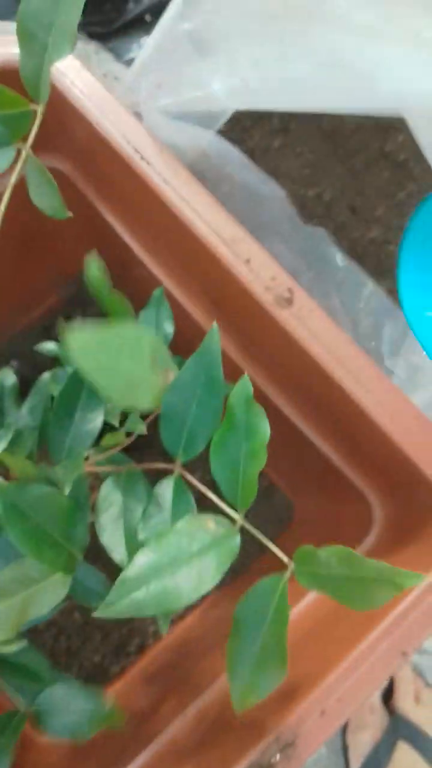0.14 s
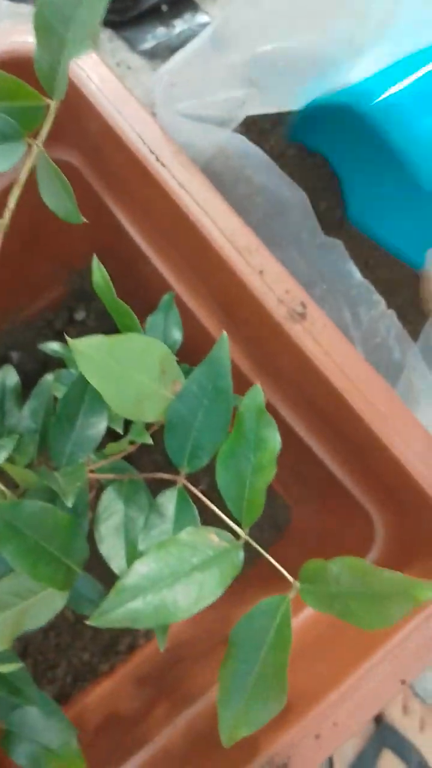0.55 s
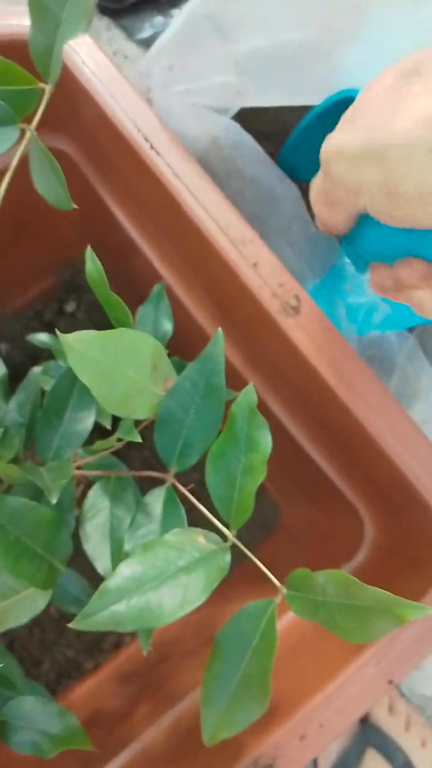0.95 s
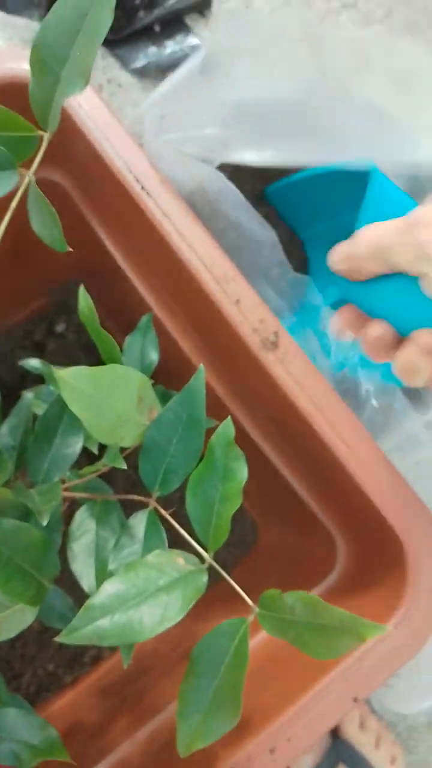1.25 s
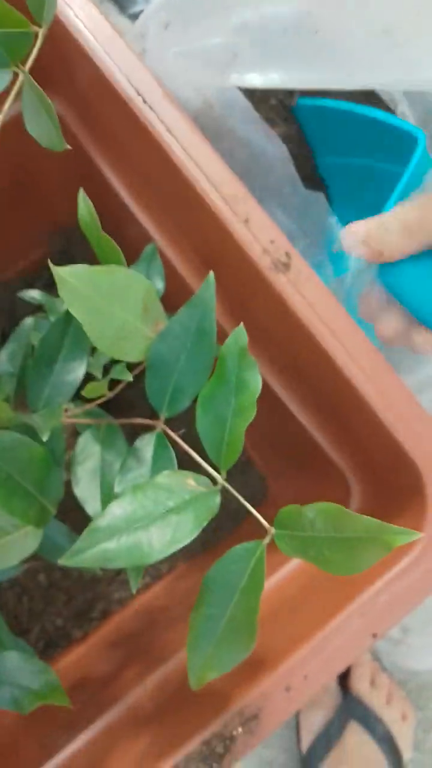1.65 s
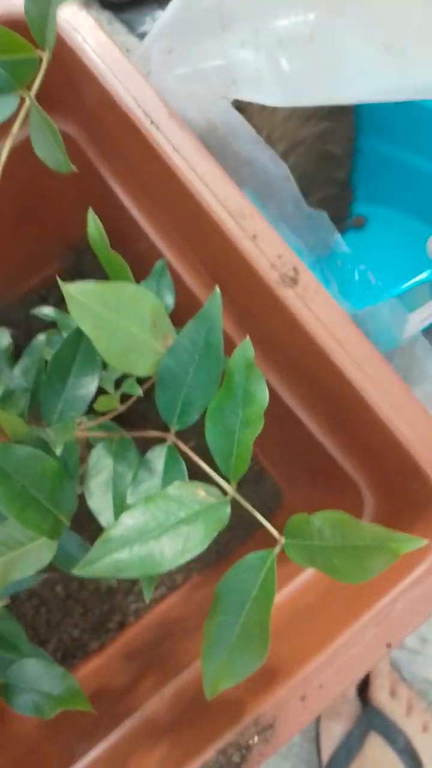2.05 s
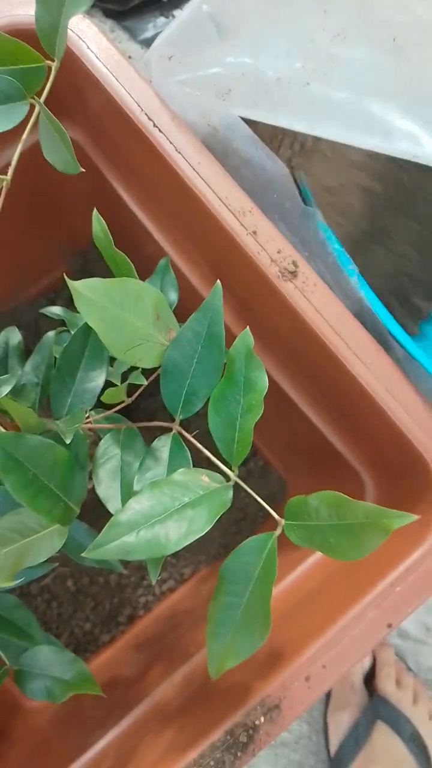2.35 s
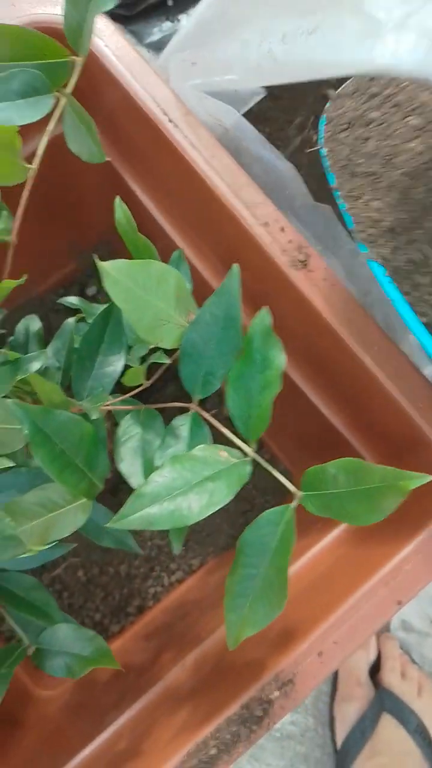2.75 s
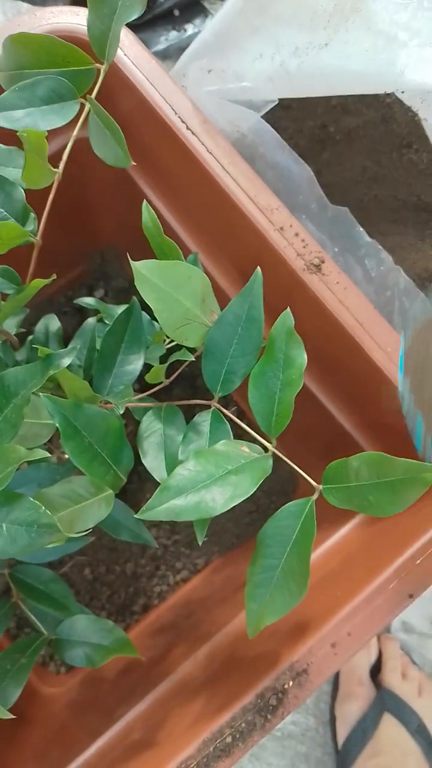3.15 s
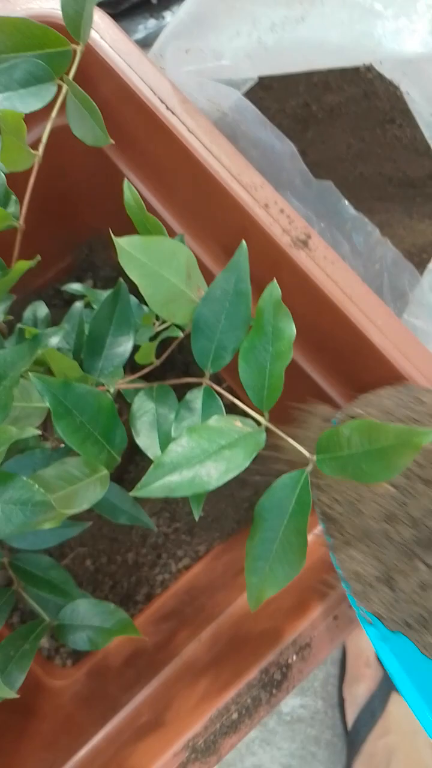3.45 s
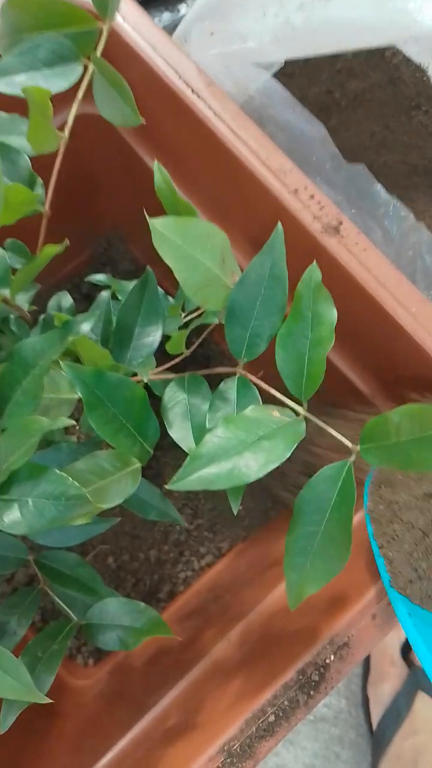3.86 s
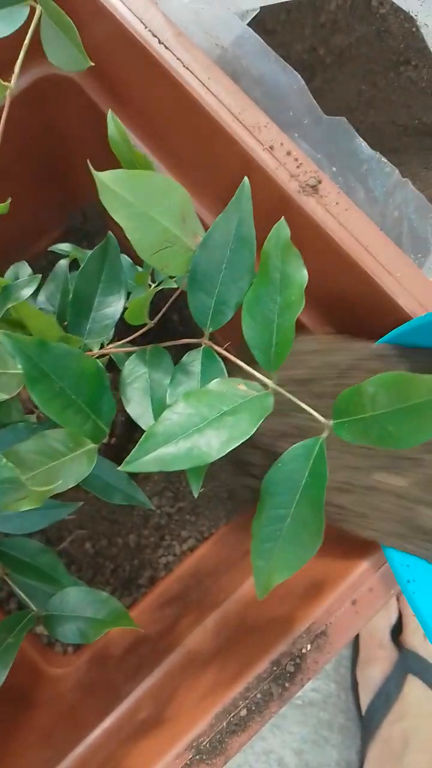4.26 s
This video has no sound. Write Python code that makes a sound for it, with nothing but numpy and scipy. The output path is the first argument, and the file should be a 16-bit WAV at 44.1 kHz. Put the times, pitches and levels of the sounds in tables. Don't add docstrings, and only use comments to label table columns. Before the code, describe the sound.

Close to a phone microphone, a plastic scoop is pushed into dry potting soil with harsh gritty surges and sharp bag-film snaps. It turns dull and quieter as it twists deep, then rasps out full with more crackles. After a brief very quiet gap, pebbles, grains and clods patter into a plastic planter. Dry, with hardly any background.

```python
import sys
import numpy as np
from scipy import signal
from scipy.fft import rfft, irfft, next_fast_len
from scipy.io import wavfile
from scipy.ndimage import uniform_filter1d, map_coordinates

SR = 44100
rng = np.random.default_rng(int(sys.argv[2]) if len(sys.argv) > 2 else 0)


def transcribe(u):
    v = np.clip(np.atleast_2d(u).T, -1, 1)
    q = np.round(v * 32767).astype(np.int16)
    wavfile.write(sys.argv[1], SR, q)


def nominal_scale(level):
    x = np.asarray(level, float) / 20
    return 10 ** x


N = 194436
EASY_DB = -50


def unit(x):
    return x / np.sqrt(np.mean(x ** 2) + 1e-20)


def curves(rows):
    s, *cols = np.transpose(rows)
    return [np.interp(np.arange(N) / SR, s, c) for c in cols]


def wobble(rate_hz):
    knots = rng.standard_normal(int(N * rate_hz / SR) + 4)
    return map_coordinates(knots, [np.arange(N) * rate_hz / SR])


def filtered(x, response):
    m = next_fast_len(N + SR // 2)
    return irfft(rfft(x, m) * response(np.fft.rfftfreq(m, 1 / SR)), m)[..., :N]


def colour(points):
    f, db = np.transpose(points)
    return lambda hz: nominal_scale(np.interp(np.log(hz + 1), np.log(f), db))


def modes(rows, lo_hz, hi_hz):
    def ring(f):
        return sum(nominal_scale(db / 2) * 1j * f * w / (c * c - f * f + 1j * f * w)
                   for c, w, db in rows if lo_hz < c < hi_hz)
    return lambda f: ring(f) ** 2 / (1 + (f / hi_hz) ** 8)


def grains(per_s, spread_db, smooth):
    hit = rng.random(N) < per_s / SR
    size = nominal_scale(spread_db * np.minimum(rng.exponential(size=N), 3))
    contacts = hit * size * rng.standard_normal(N)
    return np.sqrt(1 - smooth) * unit(contacts) + np.sqrt(smooth) * rng.standard_normal(N)


def patchy(x, depth_db):
    _, s, z = signal.stft(x, SR, nperseg=256)

    def field(bins, frames):
        return unit(uniform_filter1d(uniform_filter1d(rng.standard_normal(z.shape), bins, 0), frames, 1))

    buried = (s > 1.04) & (s < 2.1)
    gain_db = depth_db * field(3, 24) + (-0.5 + 2.5 * buried) * field(5, 6)
    return unit(signal.istft(z * nominal_scale(gain_db), nperseg=256)[1][:N])


def dull(x, hidden=True):
    t = np.arange(N) / SR
    deep = hidden * np.clip(np.minimum(t - 1.06, 2.44 - t) / 0.05, 0, 1)

    def shade(top_hz):
        return filtered(x, lambda hz: 1 / (1 + (hz / top_hz) ** 30) ** 0.5)

    return (1 - deep) * shade(12300) + deep * shade(11400)


# f/Hz, density/dB
QUIET = [(18, -34.5), (30, -13), (58, -11), (230, -11.5), (1110, -10), (1570, -22.5), (3260, -22.5),
         (15700, -42.5)]


def floor():
    return nominal_scale(-76.5) * unit(filtered(rng.standard_normal(N), colour(QUIET)))


def mic_hiss():
    noise = filtered(rng.standard_normal(N), lambda hz: 1 / (1 + (11000 / (hz + 1)) ** 8))
    return nominal_scale(-88 + 1.53 * wobble(8.1)) * unit(noise)


def yard(x):
    t = np.arange(SR // 8) / SR
    tail = rng.standard_normal(len(t)) * nominal_scale(-60 * t / 0.08)
    return x + nominal_scale(-13) * signal.fftconvolve(x, tail / np.linalg.norm(tail))[:N]


def near_wall(x):
    def answer(f):
        delay = np.exp(-2j * np.pi * f * 0.00172)
        return -0.55 * delay / (1 + (f / 2500) ** 2) / (1 + (800 / (f + 1)) ** 4)
    digging = np.arange(N) / SR < 3.7
    return x + filtered(x, answer) * digging


WAITING = [245, 590, 585, 1260]
ENTERING = [1136, 1136, 1136, 3100, 4390, 6761]
DEEP = [1070, 1750, 2500, 2500, 5170, 5900, 5900, 7800]
RISING = [1070, 2480, 3300, 3450, 4020, 4450, 5130, 6380, 7220, 7700, 8260, 9100, 10000]
CLEAR = [1790, 2566, 2970, 3200, 3790, 4240, 4800, 5930, 7150]
TIPPED = [1040, 1040, 1836, 2450, 2300, 3090, 4220, 4220, 4220, 4960, 6180, 7000, 8450, 9040]
RESTING = [570, 573, 1180, 1205, 8100]
EMPTY = [430, 430, 1530, 3730, 9700]
# from t/s, dips f/Hz, width/Hz, depth/dB
SPOTS = [
    (0, WAITING, 160, -10),
    (0.26, WAITING[:1] * 2 + ENTERING, 250, -5),
    (0.46, ENTERING, 250, -5),
    (1.2, DEEP, 220, -10),
    (1.88, RESTING, 220, -10),
    (2.12, RISING, 230, -15),
    (2.6, CLEAR, 200, -11),
    (3.12, [600, 2100], 500, -5),
    (3.75, TIPPED, 280, -11),
    (4.09, EMPTY, 200, -8),
]


def paths(x):
    t, out = np.arange(N) / SR, 0
    for start, dips, w, db in SPOTS:
        def dip(f):
            return np.prod([1 - (1 - nominal_scale(db)) * 1j * f * w / (c * c - f * f + 1j * f * w) for c in dips], axis=0)
        fade = np.clip((t - start) / 0.13, 0, 1) if start else 1
        out = out * (1 - fade) + fade * filtered(x, dip)
    return out


def knocks(rows):
    out, t = np.zeros(N + SR), np.arange(SR // 8) / SR
    chance = rng.random((len(rows), 2))
    for (s, db, hz), (a, b) in zip(rows, chance):
        cycles = max(35 * (hz / 1000) ** 0.48, 4)
        partial = np.sin(2 * np.pi * (hz * (0.65 + 0.0684 * a) * t + b))
        ring = np.sin(2 * np.pi * hz * t) + 0.34 * partial
        ring = ring * nominal_scale(-60 * t * hz / cycles) * (1 - np.exp(-t * hz / 0.22))
        out[round(s * SR):][:len(t)] += nominal_scale(db) * ring / np.abs(ring).max()
    return out[:N]


# t/s, peak/dB, ring f/Hz
LANDINGS = [
    (3.751, -50.5, 2095),
    (3.755, -42.5, 258),
    (3.793, -49.5, 270),
    (3.826, -49.5, 1650),
    (3.843, -42.5, 1660),
    (3.927, -48, 1700),
    (3.896, -36, 2120),
    (4.008, -34.5, 556),
]


def clods_landing():
    return knocks(LANDINGS)


# t/s, peak/dB, ring f/Hz
CLODS = [(0.329, -47, 840), (0.477, -37.5, 903), (0.544, -34, 1790), (0.775, -32.5, 1630),
         (0.899, -32.5, 1433), (1.151, -40, 983), (1.213, -39.5, 1440), (1.272, -38, 878),
         (1.366, -39, 1260), (1.384, -35.5, 1380), (1.393, -34, 1344), (1.5335, -34.5, 1483),
         (1.56, -35.5, 1300), (1.573, -41, 1360), (1.616, -40, 1390), (1.893, -48, 990), (2.001, -52, 856),
         (2.134, -41, 900), (2.164, -40, 910), (2.195, -41, 873), (2.24, -35, 1380), (2.288, -34.5, 900),
         (2.448, -34, 795), (2.601, -34.5, 245), (2.973, -40, 292), (3.01, -44, 1480), (3.132, -52, 1060)]


def clods_on_scoop():
    return knocks(CLODS)


def snaps(rows, t60_s, tick_share):
    out, t = np.zeros(N + SR), np.arange(SR // 30) / SR
    f = np.fft.rfftfreq(len(t), 1 / SR)
    noise = rng.standard_normal((len(rows), len(t)))
    hold_s = 0.0012
    crackle = nominal_scale(-60 * np.maximum(t - hold_s, 0) / t60_s) + 0.047 * nominal_scale(-60 * t / 0.071)
    envelope = (1 - np.exp(-t / 0.0004)) * crackle
    click = tick_share * 5 * np.exp(-((t - 0.0006) / 0.00003) ** 2)
    low = 0.23 * (1j * f / (1500 + 1j * f)) ** 2 / (1 + 1j * f / 5000) ** 2
    for (s, db, hz, top_db), n in zip(rows, noise):
        top = nominal_scale(top_db + 11.5) * (1j * f / (6000 + 1j * f)) ** 2 / (1 + 1j * f / 8500) ** 3
        peak = 1j * f * 0.33 * hz / (hz * hz - f * f + 1j * f * 0.24 * hz)
        snap = irfft(rfft(n * envelope + click) * (top + low + peak), len(t))
        out[round(s * SR):][:len(t)] += nominal_scale(db - 2.5) * snap / np.abs(snap).max()
    return out[:N]


# t/s, peak/dB, colour f/Hz, brightness/dB
PEBBLES = [(3.2854, -56, 2570, -2.5), (3.3993, -59.5, 2730, -21), (3.608, -60.5, 3300, -25.5),
           (3.725, -58, 8150, -8), (3.753, -53, 2750, -30.5), (3.7754, -43, 4770, -23),
           (3.8257, -53, 7300, -9), (3.8432, -32.5, 5570, 9), (3.8657, -34, 5340, 13),
           (3.89, -29, 10400, -6), (3.9274, -27.5, 4850, -12), (3.9305, -25.5, 8900, -14),
           (3.9375, -27, 4930, -25), (3.9838, -21, 10300, 19), (4.0064, -28.5, 4900, -14),
           (4.0258, -30, 5200, -8), (4.0533, -34, 5300, -20), (4.0694, -30, 7000, 16)]
# t/s, peak/dB, colour f/Hz, brightness/dB
SCATTER = [(3.731, -55, 3360, -20.5), (3.811, -54, 3360, -18), (3.8562, -43, 11070, -20),
           (3.9, -49, 2180, -13), (3.9044, -37, 10380, -20), (3.9601, -43, 11110, -20),
           (3.995, -32, 7190, -19), (4.0146, -27, 4780, -18), (4.0355, -33, 6550, -20),
           (4.0565, -36, 5740, -18.5), (4.0831, -45, 10900, -20), (4.1056, -50, 10160, -20),
           (4.1431, -51, 10420, -22), (4.1649, -55, 4780, -20)]


def pebbles():
    return snaps(PEBBLES, t60_s=0.01, tick_share=0.45) + nominal_scale(-2.5) * snaps(SCATTER, t60_s=0.013, tick_share=0.15)


# t/s, peak/dB, colour f/Hz, brightness/dB
FILM = [(0.478, -19.5, 5900, -49), (0.5097, -18.5, 2180, -10), (0.5215, -23, 2980, -26),
        (0.5452, -18, 9200, -4), (0.5537, -13.5, 3500, 4), (0.5648, -26, 7500, -6),
        (0.8759, -24, 6000, -22), (0.9007, -6.5, 6500, -13), (1.0786, -32.5, 6500, -18),
        (1.1513, -36, 5270, -18.5), (1.2141, -20.5, 6500, -16), (1.273, -33.5, 2860, -26),
        (1.5331, -29.5, 2750, -6), (1.5603, -41, 4400, -18), (1.6181, -29, 10000, -15),
        (1.7297, -27.5, 10300, -36), (1.89, -47, 2830, -8), (2.0053, -33.5, 6800, -23),
        (2.134, -50, 2760, -31), (2.165, -45, 2900, -27), (2.195, -39, 2390, -26),
        (2.2193, -17.5, 7440, -4), (2.243, -33, 5300, -19), (2.3364, -26.5, 2670, -32),
        (2.3575, -45, 2980, -25), (2.4498, -20.5, 2830, -23), (2.5637, -23, 2840, -29),
        (2.6018, -20, 2870, -11), (2.6699, -25, 2620, -35), (2.7714, -16.5, 3430, -14)]
# t/s, peak/dB, colour f/Hz, brightness/dB
CRACKLES = [(0.2939, -46, 6550, -20), (0.3126, -47, 3450, -20), (0.321, -49, 3530, -20),
            (0.3894, -25.5, 5470, -20), (0.395, -30, 3470, -20), (0.499, -28, 6720, -20),
            (0.5023, -23, 4090, -20), (0.6277, -21, 10030, -22), (0.8764, -24, 6200, -17),
            (0.9308, -32, 3400, -20), (1.2204, -28.5, 5560, -22), (1.2471, -44, 2930, -20),
            (1.2577, -43, 2840, -20), (1.289, -48, 5640, -20), (1.3663, -55, 2840, -25),
            (1.3854, -50, 2970, -24), (1.3953, -48, 2800, -23), (1.4255, -46, 2880, -21.5),
            (1.4396, -45, 2880, -20), (1.4934, -45.5, 2200, -28), (1.573, -38, 2200, -22),
            (1.5909, -53, 10290, -20), (1.6334, -42, 10080, -20), (1.7017, -53, 9560, -20),
            (1.7212, -46, 10120, -20), (1.771, -41.5, 9530, -22), (1.8961, -53, 2890, -18),
            (1.9567, -72, 2670, -22), (2.0917, -64.5, 6140, -14), (2.1507, -47, 6500, -20),
            (2.2145, -29, 9100, -20), (2.2815, -31, 6500, -18), (2.2941, -24.5, 2240, -25),
            (2.4029, -40, 9390, -20), (2.4562, -22, 4860, -22), (2.4646, -21, 6850, -20),
            (2.5502, -30, 9860, -20), (2.6255, -30, 6400, -23), (2.6294, -24, 5000, -20),
            (2.6424, -38, 9520, -20), (2.6795, -27, 5100, -23), (2.6898, -31, 2500, -20),
            (2.7041, -44, 9220, -20), (2.7427, -36, 9040, -20), (2.9726, -29, 7620, -18),
            (3.0247, -33, 3490, -20), (3.0447, -47, 10030, -20)]


def bag_film():
    return snaps(FILM, t60_s=0.009, tick_share=0.8) + nominal_scale(-2.5) * snaps(CRACKLES, t60_s=0.013, tick_share=0.15)


# f/Hz, width/Hz, level/dB
SCOOP = [(243, 310, 8), (513, 140, 4), (919, 400, -1), (1380, 300, -19), (2160, 6400, -8.5),
         (2980, 210, 6.5), (3500, 520, 5), (4498, 470, 1), (5100, 2600, -12.5), (5400, 1500, -21.5),
         (6450, 400, -5.5), (7450, 580, -2), (8900, 1500, -8), (10780, 5100, 0.5)]
BURIED = [(183, 43, -13), (303, 210, -3.5), (506.5, 160, -1.5), (984, 650, 20.5), (1380, 73, -3.5),
          (2140, 160, -11.5), (2923, 130, -4.5), (3300, 66, -18.5), (5440, 410, -17.5), (5950, 140, 3),
          (6170, 160, -24), (6700, 210, -4), (8050, 310, -8.5), (10000, 1200, -7)]
TWISTED = [(186, 52, -13), (306, 210, -1), (510, 180, -3), (964, 360, 18), (1380, 130, 1), (2116, 150, -11),
           (2897, 100, -3), (4400, 300, -13.5), (5630, 250, -4), (6560, 270, 0), (8200, 400, -10),
           (9300, 680, -7), (10200, 560, -8), (11300, 600, -14.5)]
PAUSED = [(300, 230, 1), (446, 210, -4.5), (900, 490, 0.5), (1310, 120, -2), (2010, 380, 0), (2900, 400, 0),
          (3560, 700, -3.5), (5900, 500, -1), (6740, 500, 1), (8500, 900, -3), (10000, 1300, 2)]
LOADED = [(270, 120, 5), (508, 120, 0), (906, 600, 0), (1380, 440, -15.5), (2300, 1600, -8),
          (2800, 680, 7.5), (3500, 140, 3.5), (4400, 700, 2.5), (5300, 1700, -4.5), (6500, 600, -12),
          (7300, 700, -6), (8900, 2000, -2), (10480, 4200, -9.5)]
PLANTER = [(260.6, 97, -18), (540, 300, 2), (860, 220, -12.5), (1540, 190, -13.5), (1870, 940, -4.5),
           (2730, 1400, -15), (3730, 261, -12), (4810, 540, 12.5), (5630, 360, -10), (6560, 600, -15.5),
           (7600, 1200, -13.5), (8980, 1400, -16.5), (10300, 1500, 2.5)]
SETTLING = [(161, 25, 4.5), (332, 120, -28.5), (670, 170, 7), (934, 130, -15), (1300, 200, -12.5),
            (2160, 980, -21), (2990, 1400, -13.5), (4270, 530, -11), (5200, 1700, -9.5), (7500, 3700, 5),
            (10000, 1400, -17)]
# from t/s, resonances (f/Hz, width/Hz, level/dB), uncoloured rustle share/0-1
STAGES = [
    (0, SCOOP, 0.55),
    (1.04, BURIED, 0.1),
    (1.5, TWISTED, 0.16),
    (1.87, PAUSED, 0.09),
    (2.101, LOADED, 0.54),
    (3.7, PLANTER, 0.1),
    (4.169, SETTLING, 0.06),
]


def shell(x, lo_hz, hi_hz):
    t, out = np.arange(N) / SR, 0

    def band(f):
        return 1 / (1 + (f / hi_hz) ** 8) / (1 + (lo_hz / (f + 1)) ** 8)

    rustle = unit(filtered(x[::-1], band))
    for start, body, share in STAGES:
        fade = np.clip((t - start) / 0.05, 0, 1) if start else 1
        ring = unit(filtered(x, modes(body, lo_hz, hi_hz)))
        mixed = np.sqrt(1 - share) * ring + np.sqrt(share) * rustle
        out = out * (1 - fade) + fade * mixed
    return out


# t/s, level/dB
SLIDE = [
    [(0.22, -91), (0.295, -75), (0.316, -53), (0.492, -43.5), (0.58, -48), (0.716, -37.5), (0.82, -48.5),
     (0.898, -39), (0.944, -48.5)],
    [(1.108, -58.5), (1.204, -62), (1.3, -68), (1.5, -70.5), (1.63, -53), (1.74, -66.5), (1.79, -64.5),
     (1.84, -76), (2.046, -75.5)],
    [(2.198, -58), (2.358, -46), (2.434, -50), (2.454, -41.5), (2.596, -42.5), (2.966, -48), (3.064, -56),
     (3.15, -67), (3.26, -82.5)],
    [(3.36, -100), (3.72, -90.5), (3.812, -73), (3.896, -60.5), (3.978, -60), (4.068, -66), (4.094, -69),
     (4.21, -75), (4.409, -78.5)],
]
# t/s, level/dB
PRESS = [
    [(0.1, -80.5), (0.29, -80), (0.314, -53.5), (0.464, -53), (0.508, -46), (0.644, -55.5), (0.702, -51),
     (0.802, -51), (0.952, -54)],
    [(1.212, -49.5), (1.33, -52.5), (1.41, -49), (1.57, -51), (1.676, -55.5), (1.73, -49.5), (1.824, -62),
     (2.05, -61.5), (2.1, -60.5)],
    [(2.14, -49.5), (2.284, -44.5), (2.404, -49), (2.478, -44.5), (2.86, -52.5), (2.94, -48), (3.098, -61),
     (3.3, -78.5), (3.45, -95.5)],
    [(3.72, -86), (3.75, -59), (3.784, -66.5), (3.932, -49), (3.97, -61), (4.002, -53.5), (4.146, -65.5),
     (4.338, -62.5), (4.409, -68)],
]


def effort(strokes):
    return curves(np.concatenate(strokes))[0] - EASY_DB


# from t/s, lower hiss/dB, dust/dB, hollow body/dB, rim/dB
GRIPS = [(0.0, -4, 26, 21.5, 16), (0.289, -4, -69, 2.5, -4), (0.6, -3.5, -20.5, 2, -1.5),
         (1.04, -1, -10, -0.5, -14), (1.5, -9, -21, -4.5, 2.5), (1.87, -11, -12, -3, -2.5),
         (2.1, -3, -30, -2, -5), (2.45, -3.5, -38, 3.5, -18), (2.85, -5.5, -25, 4.5, -23),
         (3.298, 3, 20.5, -1, 46), (3.722, -6.5, 12.5, 3, 15), (4.12, -3.5, 6, 1, 8)]


def grip():
    regrip_s, rows = 0.031, []
    for (s, *now), (_, *old) in zip(GRIPS, GRIPS[:1] + GRIPS):
        rows += [(s, *old), (s + regrip_s, *now)]
    return [EASY_DB + db for db in curves(rows)]


# t/s, peak/dB, rise/s, fall/s (both over 20 dB)
HEAVES = [(0.178, -46.5, 0.15, 0.31), (0.32, -43.5, 0.031, 0.19), (0.55, -56.5, 0.09, 0.06),
          (0.42, -63, 0.1, 0.092), (0.96, -41, 0.03, 0.26), (1.28, -60, 0.19, 0.17),
          (1.57, -46.5, 0.11, 0.43), (1.659, -54, 0.11, 0.56), (1.78, -55, 0.2, 0.19),
          (2.26, -45.5, 0.15, 0.42), (2.68, -44, 0.14, 0.31), (2.834, -44.5, 0.26, 0.34),
          (3.02, -61, 0.13, 0.59), (3.17, -65, 0.11, 0.18), (3.4, -73.5, 0.2, 0.37),
          (3.77, -62.5, 0.056, 0.17), (4.25, -69, 0.35, 0.22), (4.39, -62, 0.17, 0.11)]


def heave():
    t, power = np.arange(N) / SR, 0
    for s, db, rise_s, fall_s in HEAVES:
        away = np.maximum((s - t) / rise_s, (t - s) / fall_s)
        power = power + nominal_scale(db - 20 * away) ** 2
    return np.sqrt(power)


# f/Hz, width/Hz, level/dB
BED = [(66.96, 160, -14), (75.4, 11, 1), (113, 140, -5)]


def mass(slip):
    slide, press, bed = effort(SLIDE), effort(PRESS), heave()
    _, _, body_db, rim_db = grip()
    crumbs = grains(900, spread_db=2.0, smooth=0.45)
    drumming_db = 0.57 * slip + 1.3 * wobble(45)
    ring = nominal_scale(EASY_DB + press + drumming_db) * patchy(shell(crumbs, lo_hz=600, hi_hz=1800), depth_db=1.5)
    rim_level = nominal_scale(rim_db + 0.86 * slide + press + drumming_db)
    rim = rim_level * patchy(shell(crumbs, lo_hz=1800, hi_hz=2400), depth_db=2.0)
    lumps = grains(300, spread_db=2.5, smooth=0.6)
    body = unit(nominal_scale(1.5 * wobble(30)) * shell(lumps, lo_hz=140, hi_hz=600))
    shaken = np.hypot(nominal_scale(body_db + 0.98 * press - 3.5), nominal_scale(-11) * bed)
    rumble = unit(filtered(rng.standard_normal(N), modes(BED, lo_hz=20, hi_hz=200)))
    return ring + rim + shaken * body + bed * rumble


# f/Hz, density/dB
HISS = [(2350, -24.5), (4000, -13), (4770, 2.5), (6420, 4), (8550, -14), (10400, 3.5), (11500, -45.5),
        (15000, -54)]
# f/Hz, density/dB
DUST = [(6940, -1.5), (11800, 0.5), (13500, -3), (15700, -18.5)]


def grit(slip):
    slide = effort(SLIDE)
    low_db, dust_db, _, _ = grip()
    rub = grains(4000, spread_db=2.5, smooth=0.55)
    bright = unit(0.45 * unit(filtered(rub, colour(HISS))) + shell(rub, lo_hz=4500, hi_hz=12000))
    hiss = nominal_scale(EASY_DB + slide + 1.1 * slip) * patchy(bright, depth_db=3.0)
    low = nominal_scale(low_db + slide + 1.9 * slip) * patchy(shell(rub, lo_hz=2400, hi_hz=4500), depth_db=2.5)
    dust_level = nominal_scale(dust_db + 1.83 * slide + 1.7 * slip)
    dust = dust_level * patchy(filtered(rub, colour(DUST)), depth_db=2.2)
    return dull(hiss + low) + nominal_scale(7.5) * dust


def scene():
    slip_db = 0.7 * wobble(27.39) + 1.4 * wobble(70)
    rubbing = grit(slip_db) + nominal_scale(-3) * mass(slip_db)
    clicks = dull(yard(bag_film() + pebbles()), hidden=False)
    reflected = paths(near_wall(clicks + rubbing + floor()))
    return (reflected + clods_on_scoop() + clods_landing() + mic_hiss())[None]


# from t/s, to t/s, from f/Hz, to f/Hz
STARVED = [(0.385, 0.465, 12700, 14300), (0.465, 0.59, 12900, 17000), (0.59, 0.66, 14400, 15200),
           (0.78, 0.89, 15400, 17000), (0.94, 1.08, 14600, 17000), (1.12, 1.2, 12800, 14000),
           (1.23, 1.29, 12200, 14000), (1.6, 1.69, 12500, 13000), (2.33, 2.4, 12000, 13600),
           (2.4, 2.54, 13200, 13800), (2.555, 2.765, 13400, 17000), (2.79, 3.1, 13000, 14400),
           (2.99, 3.08, 14400, 17000), (4.0, 4.12, 15200, 17000)]


def starve(x):
    hz, s, z = signal.stft(x, SR, nperseg=512)
    for start, end, lo_hz, hi_hz in STARVED:
        band = (hz[:, None] > lo_hz) & (hz[:, None] < hi_hz)
        z = z * ~(band & (s > start) & (s < end))
    return signal.istft(z, nperseg=512)[1][..., :N]


def roll_off(x):
    return signal.sosfilt(signal.butter(12, 16650, fs=SR, output="sos"), x)


def record(dry):
    def response(hz):
        return (hz < 15900) * (hz / 55) ** 3 / (1 + (hz / 55) ** 6) ** 0.5
    mix = starve(filtered(dry, response))
    return roll_off(mix)


dry = scene()
out = record(dry)
transcribe(out)
```